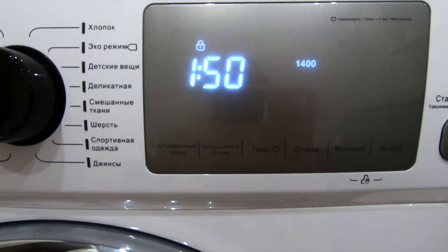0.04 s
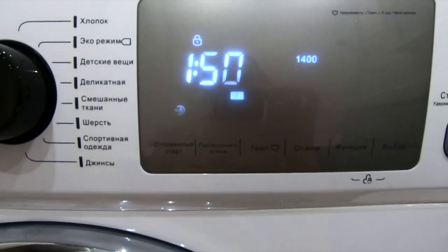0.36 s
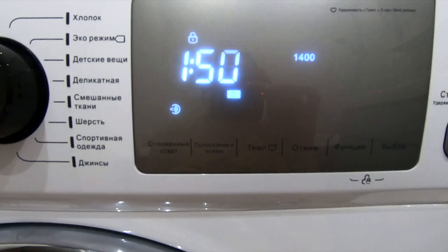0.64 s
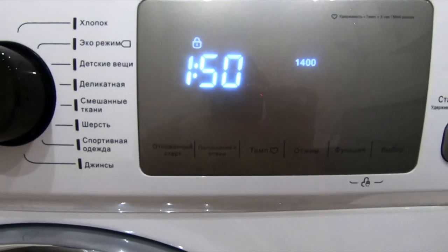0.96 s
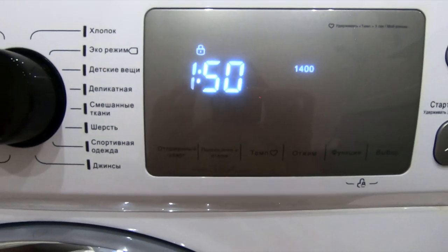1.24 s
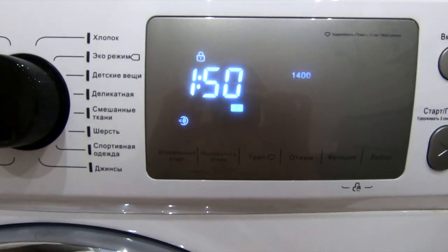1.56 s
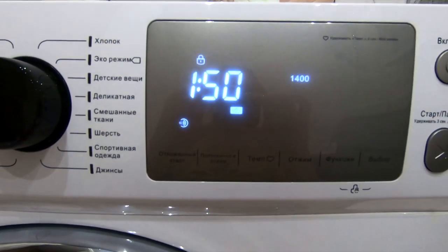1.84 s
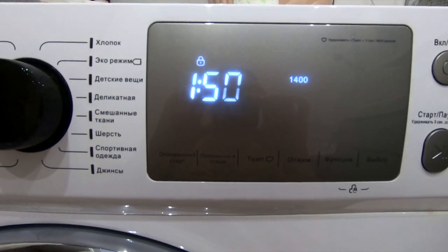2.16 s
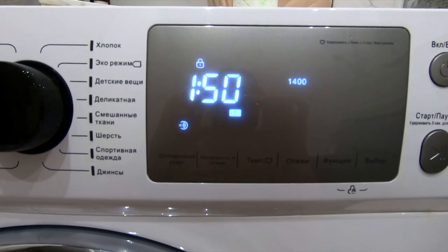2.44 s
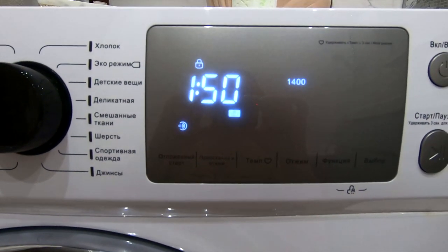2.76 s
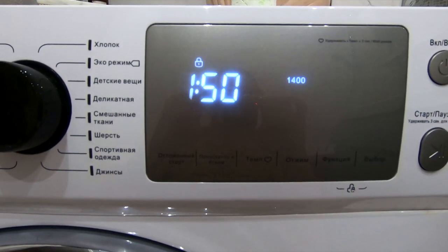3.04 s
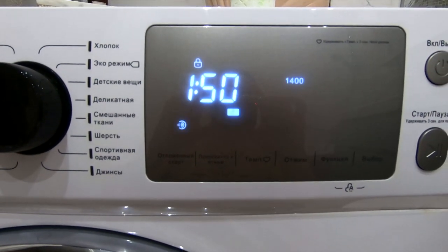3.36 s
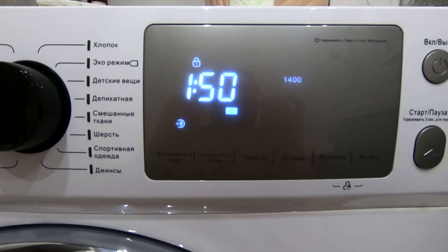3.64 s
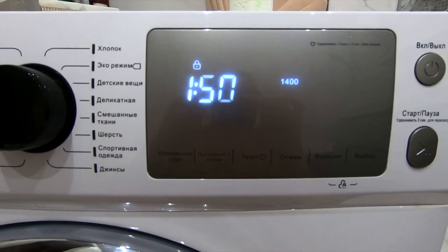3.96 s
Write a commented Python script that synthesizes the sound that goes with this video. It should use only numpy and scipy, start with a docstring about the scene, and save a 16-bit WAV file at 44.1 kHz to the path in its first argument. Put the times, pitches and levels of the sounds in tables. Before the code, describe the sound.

Washing machine locking with a snap, its pump clattering to life and settling into a hum.

```python
"""Faint scuffs and rustles come first, over the quiet air of a small, hard-walled room.
Then a washing machine, heard from a hand-held camera at its panel, snaps its ringing door lock.
A relay (an electric switch) clicks and the drain pump kicks in. Its rotor, the spinning part,
knocks about and shakes the cabinet for half a second, then falls in step with the mains power
and hums while the water gurgles."""
import sys
import numpy as np
from scipy import signal
from scipy.fft import rfft, irfft
from scipy.io import wavfile

SR = 44100
rng = np.random.default_rng(int(sys.argv[2]) if len(sys.argv) > 2 else 0)


def generate_wav(signal):
    """Clip the signal to [-1, 1] and save it as 16-bit WAV at the path in sys.argv[1]."""
    frames = np.transpose(np.atleast_2d(signal))
    scaled = np.clip(frames, -1, 1) * 32767
    pcm = np.round(scaled).astype(np.int16)
    wavfile.write(sys.argv[1], SR, pcm)


N = 176400
T = np.arange(N) / SR


def amp(db):
    """Turns decibels into a gain."""
    return 10 ** (np.asarray(db) / 20)


def unit(x):
    """Scales a signal to an average strength (rms) of 1."""
    return x / np.sqrt(np.mean(x ** 2) + 1e-20)


def read(points, hz):
    """Looks up a table on a log-frequency axis."""
    f, value = np.transpose(points)
    return np.interp(np.log(hz + 1), np.log(f + 1), value)


def level(points):
    """Gain over time from (t/s, level/dB) points."""
    return amp(np.interp(T, *np.transpose(points)))


def add(mix, s, sound):
    """Mixes a sound in at time s."""
    part = mix[..., round(s * SR):][..., :sound.shape[-1]]
    part += sound[..., :part.shape[-1]]


def drift(rate_hz):
    """A slow random wobble."""
    spectrum = rfft(rng.standard_normal(N))
    return unit(irfft(spectrum / (1 + (np.fft.rfftfreq(N, 1 / SR) / rate_hz) ** 4), N))


def swell(s, length):
    """A rounded rise and fall."""
    return np.sqrt(abs(np.sin(np.pi * np.clip((T - s) / length, 0, 1))))


def wavering(hz, wander_hz):
    """A tone with unsteady pitch."""
    pitch = hz + wander_hz * drift(rate_hz=12.3)
    return np.sqrt(2) * np.sin(2 * np.pi * np.cumsum(pitch) / SR)


# How alike left and right are: f/Hz, likeness (1 = the same)
LIKENESS = [(130, 0.94), (290, 0.97), (420, 0.91), (650, 0.34), (1200, 0.18), (3000, 0.085)]
def diffuse(size):
    """White noise at two microphones, alike in the bass."""
    a, b = rfft(rng.standard_normal((2, size)))
    same = np.clip(read(LIKENESS, np.fft.rfftfreq(size, 1 / SR)), -1, 1)
    mid, side = a * np.sqrt((1 + same) / 2), b * np.sqrt((1 - same) / 2)
    return irfft(np.array([mid + side, mid - side]), size)


def noise(spectrum):
    """Stereo noise with a given colour, that is, a balance of low and high."""
    gain = amp(read(spectrum, np.fft.rfftfreq(N, 1 / SR)))
    return unit(irfft(rfft(diffuse(N)) * gain, N))


def colour(x, spectrum, size=4096):
    """Gives a sound a colour without smearing it back in time."""
    log_gain = np.log(amp(read(spectrum, abs(np.fft.fftfreq(size, 1 / SR)))))
    response = np.fft.ifft(np.exp(np.conj(signal.hilbert(log_gain)))).real[:size // 2]
    return signal.oaconvolve(x, response[None] / np.linalg.norm(response), axes=1)[:, :N]


# The room's echo: f/Hz, time to fade by 60 dB/s
ROOM_FADE = [(100, 0.42), (400, 0.38), (1500, 0.39), (5000, 0.34), (12000, 0.23)]
def room(x, wet_db, size=22050):
    """Hard walls add a dense echo, wet_db above the direct sound; its treble dies first."""
    hz, t, slices = signal.stft(diffuse(size), SR, nperseg=256)
    fade = amp(-60 * t / read(ROOM_FADE, hz)[:, None])
    echo = signal.istft(slices * fade, SR, nperseg=256)[1]
    echo *= amp(wet_db) / np.linalg.norm(echo[0])
    echo[:, 0] += 1  # the direct sound
    return signal.fftconvolve(x[None], echo / np.linalg.norm(echo[0]), axes=1)[:, :N]


def strikes(rows, contact_s, size=600):
    """One short gritty hit for each (t/s, level/dB) row, no two alike."""
    out = np.zeros(N)
    fade = np.exp(-np.arange(size) / SR / contact_s)
    for s, db in rows:
        spectrum = rfft(rng.standard_normal(size) * fade, 2 * size)
        grit = irfft(spectrum / np.sqrt(abs(spectrum)))[:size]  # evens out the colour
        add(out, s, amp(db) * grit / np.linalg.norm(grit))
    return out


def ring(x, modes, size=26000):
    """A struck part rings with fading tones, a little out of step at the two microphones."""
    t, out = np.arange(size) / SR, np.zeros((2, size))
    for hz, db, fade_s in modes:
        apart = np.arccos(np.clip(read(LIKENESS, hz), -1, 1)) * rng.choice([-.5, .5])
        out += amp(db - 60 * t / fade_s) * np.sin(2 * np.pi * hz * t + np.array([[apart], [-apart]]))
    return signal.fftconvolve(x[None], out, axes=1)[:, :N]


def rubs(rows, spectrum):
    """Soft swells of rubbing noise."""
    return sum(amp(db) * swell(s, length) for s, length, db in rows) * noise(spectrum)


def bursts(rows, octaves, attack_s, size=13230):
    """A quickly dying band of noise for each row."""
    t, hz, out = np.arange(size) / SR, np.fft.rfftfreq(size, 1 / SR), np.zeros((2, N))
    for s, centre_hz, db, decay_s in rows:
        band = np.exp(-(np.log2((hz + 1) / centre_hz) / octaves) ** 2)
        hiss = unit(irfft(rfft(diffuse(size)) * band, size))
        shape = np.minimum(t / attack_s, 1) * np.exp(-np.maximum(t - attack_s, 0) / decay_s)
        add(out, s, amp(db) * hiss * shape)
    return out


# Colour of the air, and of its part that differs left and right: f/Hz, level/dB
AIR_COLOUR = [(65, -40), (110, -12.5), (179, -2.5), (263, -7.5), (291, -2.5), (322, -9.5), (357, -5),
              (474, -20), (642, -9), (682, -10.5), (1020, -23.5), (2710, -29.5), (3530, -27.5), (3980, -31),
              (14000, -47)]
WIDE_COLOUR = [(60, -38), (150, 1), (300, -6), (450, -8.5), (850, -1), (1130, -10), (2500, -28.5),
               (6000, -45.5)]
# Loudness of the air: t/s, level/dB
AIR_LEVEL = [(0, -70), (.55, -70), (1, -65.5), (1.5, -67.5), (1.8, -66), (2.4, -68.5), (3, -63.5)]
# Lasting tones: f/Hz, level/dB
AIR_TONES = [(636, -79.5), (3400, -98), (3639, -98)]
# Brief low drones: t/s, length/s, f/Hz, level/dB
DRONES = [(0.945, 0.17, 167, -65), (1.645, 0.16, 266.5, -64.5), (2.603, 0.22, 278.6, -69)]
def room_air():
    """A soft rush of air with faint tones and drones in it."""
    tones = sum(amp(db) * wavering(hz, wander_hz=2.58) for hz, db in AIR_TONES)
    drones = sum(amp(db) * swell(s, length) * wavering(hz, wander_hz=7.6)
                 for s, length, hz, db in DRONES)
    air = level(AIR_LEVEL) * noise(AIR_COLOUR)
    wide = amp(-70) * noise(WIDE_COLOUR)[0] * np.array([[1], [-1]])
    return air + wide + tones + drones


# Bumps of the hand: t/s, length/s, level/dB
BUMPS = [(.72, 0.13, -50.5), (1.26, 0.32, -59), (2.64, 0.1, -51)]
# Their colour: f/Hz, level/dB
HAND_COLOUR = [(8, -16), (22, -2), (30, -6.5), (42, -23), (90, -42.5), (1000, -100)]
def hand_rumble():
    """The hand on the camera makes low bumps and a steady rumble."""
    return rubs(BUMPS, HAND_COLOUR) + amp(-64) * noise(HAND_COLOUR)


# Rustles and scuffs: t/s, length/s, level/dB
RUSTLES = [(1.385, .1, -64.5), (1.57, 0.15, -76), (1.88, 0.13, -74)]
SCUFFS = [(.63, 0.077, -75), (.8, 0.87, -73), (1.74, 0.13, -68.5), (1.97, .13, -64.5), (2.87, 0.076, -62.5)]
# Their colours: f/Hz, level/dB
RUSTLE_COLOUR = [(600, 0.5), (3700, -2.5), (4250, 5.5), (5300, -5.5), (8500, -8), (13000, -21)]
SCUFF_COLOUR = [(400, -6), (800, 5), (1450, 4.5), (2200, -5.5), (3500, -23), (5000, -25.5), (12000, -44)]
def rustles_and_scuffs():
    """Light rubbing makes bright rustles and duller scuffs."""
    return rubs(RUSTLES, RUSTLE_COLOUR) + rubs(SCUFFS, SCUFF_COLOUR)


# Ticks: t/s, level/dB
TICKS = [(2.727, -39.5), (2.779, -23), (2.946, -23.5), (3.71, -34), (3.76, -25), (3.80, -32), (3.84, -36),
         (3.952, -28.5)]
# Their colour: f/Hz, level/dB
TICK_COLOUR = [(500, -23), (1500, -8), (4600, -9), (5600, -0.5), (6600, -6.5), (8300, -5), (10000, -12),
               (13000, -18.5), (14500, -40)]
# Taps: t/s, f/Hz, level/dB, decay/s
TAPS = [(.745, 1360, -68.5, 0.012), (2.191, 4340, -68.5, .008), (2.256, 1580, -68.5, .008),
        (2.873, 940, -62.5, 0.038), (2.885, 1357, -62.5, 0.075)]
def ticks_and_taps():
    """Light plastic ticks echo in the room, among faint pitched taps."""
    ticks = colour(room(strikes(TICKS, contact_s=.002), wet_db=19), TICK_COLOUR)
    return ticks + bursts(TAPS, octaves=0.19, attack_s=0.0027)


# Hits of the lock: t/s, level/dB
LOCK_HITS = [(2.3625, 3.5), (2.366, 0.5), (2.372, -5.5)]
# Their colour: f/Hz, level/dB
LOCK_COLOUR = [(600, -42), (1250, -17.5), (1600, -1.5), (1900, 0), (2400, -5.5), (3000, -27), (3800, -25),
               (4400, -12.5), (4900, -22), (5900, -9.5), (6900, -24), (9500, -23.5), (14000, -34)]
# The lock's ringing tones: f/Hz, level/dB, time to fade by 60 dB/s
LOCK_TONES = [(1663, -16, .3), (1890, 4.5, 0.43), (2060, 4, .17), (2353, -7, 0.2), (4290, -22, .24),
              (5440, -16, .23), (6078, -18, .2)]
def door_lock():
    """The lock snaps shut in three quick hits that set it ringing."""
    hits = strikes(LOCK_HITS, contact_s=0.0011)
    snap = colour(room(hits, wet_db=9), LOCK_COLOUR)
    return amp(-18) * snap + amp(-57) * ring(hits, LOCK_TONES)


# Colour of the relay's click: f/Hz, level/dB
RELAY_COLOUR = [(300, -23), (800, 6.5), (1300, 7), (2200, -7), (4000, -6.5), (5000, 8.5), (5400, -1),
                (5900, 0), (6700, -13), (9400, -2.5), (11000, -20), (14000, -15)]
def relay(at_s=3.0105, db=-15.5):
    """The pump's switch closes with one click."""
    hit = strikes([(at_s, db)], contact_s=0.0058)
    return colour(room(hit, wet_db=-1), RELAY_COLOUR)


def motor_strain(at_s=3.033, length_s=0.022):
    """The motor groans briefly before the rotor breaks free."""
    return amp(-46.5) * swell(at_s, length_s) * wavering(hz=321, wander_hz=25.4)


# Sharp cracks: t/s, f/Hz, level/dB
CRACKS = [(3.074, 6000, -41), (3.1, 2800, -39.5), (3.132, 3400, -37.5), (3.153, 3000, -37),
          (3.163, 2200, -32.5), (3.197, 2300, -33.5), (3.254, 3700, -37.5), (3.297, 2600, -36),
          (3.367, 3200, -36.5), (3.41, 3300, -42), (3.456, 2500, -31), (3.544, 2600, -34),
          (3.561, 7500, -55)]
# Gurgles: t/s, f/Hz, level/dB, decay/s
GURGLES = [(3.725, 2390, -54.5, 0.085), (3.77, 3750, -56.5, 0.12), (3.785, 1470, -51, .02),
           (3.853, 2100, -50, 0.018)]
def cracks_and_gurgles(crack_decay_s=0.013):
    """Sharp cracks sound with the rotor's knocks as the pump starts, then the water gurgles softly."""
    cracks = bursts([(*row, crack_decay_s) for row in CRACKS], octaves=0.61, attack_s=.0015)
    return cracks + bursts(GURGLES, octaves=0.56, attack_s=0.0084)


# Tones of the hum: multiple of the mains frequency, level/dB
HUM_TONES = [(2, -40.5), (4, -40), (6, -54), (7, -50), (8, -45.5), (9, -52.5), (12, -62.5)]
# Colour of the churning water: f/Hz, level/dB
CHURN_COLOUR = [(20, -22), (40, -21), (65, -3), (100, -1), (150, -8.5), (240, -6), (330, 0), (420, -3),
                (520, -9.5), (700, -18), (1300, -20), (2100, -30.5), (3200, -30), (4200, -40),
                (5500, -47.5), (8500, -46), (14000, -56)]
def pump_running(mains_hz=49.37, in_step_s=3.66, settle_s=0.028, waver_db=2.5, flicker_db=0.64):
    """In step with the mains, the pump hums and churns a little water."""
    hum = np.zeros(N)
    for multiple, db in HUM_TONES:
        gain = np.sqrt(2) * amp(db + waver_db * drift(rate_hz=8.1))
        hum += gain * np.sin(2 * np.pi * (multiple * mains_hz * T + rng.random()))
    churn = amp(-38.5 + flicker_db * drift(rate_hz=64)) * noise(CHURN_COLOUR)
    fade_in = np.clip((T - in_step_s) / settle_s + .5, 0, 1)
    return fade_in * (hum + churn)


# Loudness of the boom: t/s, level/dB
BOOM_LEVEL = [(3.055, -69), (3.075, -26), (3.15, -29.5), (3.22, -23), (3.28, -24), (3.35, -31.5),
              (3.39, -32), (3.44, -21.5), (3.51, -32.5), (3.565, -22.5), (3.645, -23.5), (3.685, -35),
              (3.73, -72)]
# Colour of the shaking: f/Hz, level/dB
SHAKE_COLOUR = [(30, -30), (52, -23), (66, -15), (80, 2.5), (100, -3.5), (125, -4.5), (145, -2.5),
                (170, -20), (260, -42), (2000, -100)]
def cabinet_boom(hz=106, wander=0.0367):
    """The rattling pump shakes the cabinet at its lowest natural note."""
    cycles = np.cumsum(hz * (1 + wander * drift(rate_hz=19.2))) / SR
    note = np.sqrt(2) * np.sin(2 * np.pi * cycles)
    started = T > BOOM_LEVEL[0][0]
    return level(BOOM_LEVEL) * started * (note + amp(-6.5) * noise(SHAKE_COLOUR))


# Loudness of the chatter: t/s, level/dB
CHATTER_LEVEL = [(3.05, -46), (3.065, -2.5), (3.14, -3), (3.19, 0), (3.24, 0.5), (3.39, -1.5), (3.47, 1),
                 (3.53, -16), (3.57, -14), (3.63, -19), (3.70, -20)]
def rotor_chatter(hits_per_s=480, spread_db=2.2):
    """The loose rotor makes tiny random hits between its knocks."""
    running = (T > CHATTER_LEVEL[0][0]) & (T < CHATTER_LEVEL[-1][0])
    hits = (rng.random(N) < hits_per_s / SR) * rng.choice([-1, 1], N)
    strength = amp(-16 + spread_db * np.clip(rng.standard_normal(N), -2, 2))
    return hits * running * level(CHATTER_LEVEL) * strength


# Knocks: t/s, clack and edge level/dB, thud level/dB
KNOCKS = [(3.053, -8, -8.5), (3.074, -4.5, 5.5), (3.083, -13.5, -3), (3.097, -10.5, -7), (3.116, 0, 1),
          (3.153, 1.5, -3.5), (3.164, -1, 3), (3.178, -1, -17), (3.197, -0.5, 2.5), (3.209, 1, 3.5),
          (3.24, -18, -3.5), (3.27, 0, -3), (3.297, -1.5, -5), (3.331, -1, -6), (3.345, -8, -3),
          (3.369, -4, -8), (3.413, 2.5, -21), (3.435, -4, 3), (3.447, -2, 0), (3.457, -1.5, -3),
          (3.47, -6, 4), (3.545, 2, -7), (3.559, 1.5, -2.5), (3.58, -24, -3.5), (3.603, -23, -5)]
# Colours of a knock's middle clack, low thud and bright edge: f/Hz, level/dB
CLACK_COLOUR = [(30, -60.5), (400, -26), (560, -5), (680, -6), (850, -4.5), (1080, -3), (1350, -3),
                (1600, -8), (2100, -12.5), (3100, -19.5), (4200, -28.5), (8000, -51), (14000, -81)]
THUD_COLOUR = [(90, -27.5), (140, -6.5), (240, -12.5), (310, -1.5), (370, 0), (480, -7.5), (600, -15.5),
               (1000, -54.5), (6000, -93)]
EDGE_COLOUR = [(100, -42.5), (1200, -25), (2500, 2.5), (3600, -2.5), (5000, -9), (7000, -13), (9000, -16),
               (10200, -28.5), (12300, -28), (14400, -48)]
# The cabinet panels' ringing tones: f/Hz, level/dB, time to fade by 60 dB/s
PANEL_TONES = [(335, -2, 0.16), (372.5, 0.5, 0.34), (456, -3, 0.7), (601, -5.5, 0.13), (646, -0.5, 0.36),
               (1108, 1, 0.23), (1220, 4.5, 0.2), (1346, 3, 0.19), (1530, -0.5, 0.11)]
def pump_rattle(contact_s=.0012):
    """The rotor hits its stops and chatters; the housing clacks and thuds, and the panels ring."""
    chatter = rotor_chatter()
    times, clack_db, thud_db = np.transpose(KNOCKS)
    clack = strikes(zip(times, clack_db), contact_s) + chatter
    thud = strikes(zip(times, thud_db), contact_s) + amp(1) * chatter
    edge = strikes(zip(times, clack_db), contact_s) + amp(-9) * chatter
    return (amp(-1.5) * colour(room(clack, wet_db=10), CLACK_COLOUR)
            + amp(1) * colour(room(thud, wet_db=2), THUD_COLOUR)
            + amp(-13.5) * colour(room(edge, wet_db=21), EDGE_COLOUR)
            + amp(-36) * ring(clack, PANEL_TONES))


# Where the machine is heard: f/Hz, right minus left level/dB
BALANCE = [(200, 0), (400, 0.5), (1000, 3.5), (2300, 0), (4200, 2), (7700, 5), (12500, -2.5)]
def scene():
    """The machine stands a little to the right, with the quiet background around it."""
    pump = motor_strain() + pump_rattle() + cracks_and_gurgles() + cabinet_boom() + pump_running()
    machine = pump + door_lock() + ticks_and_taps() + relay()
    hz, _, slices = signal.stft(machine, SR, nperseg=512)
    lean_db = read(BALANCE, hz)[:, None] / 2
    machine = signal.istft(slices * amp([-lean_db, lean_db]), SR, nperseg=512)[1][:, :N]
    return machine + rustles_and_scuffs() + room_air() + hand_rumble()


def record(dry, cutoff_hz=14450):
    """The camera cuts off the highest treble."""
    low_pass = signal.firwin(511, cutoff_hz, window=("kaiser", 9), fs=SR)
    return signal.oaconvolve(dry, low_pass[None], "same")


dry = scene()
out = record(dry)
generate_wav(out)
```